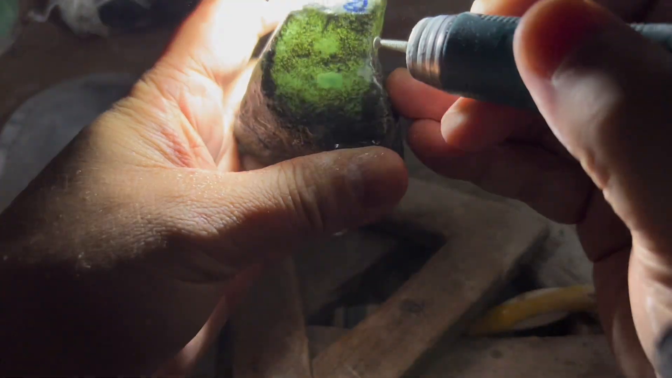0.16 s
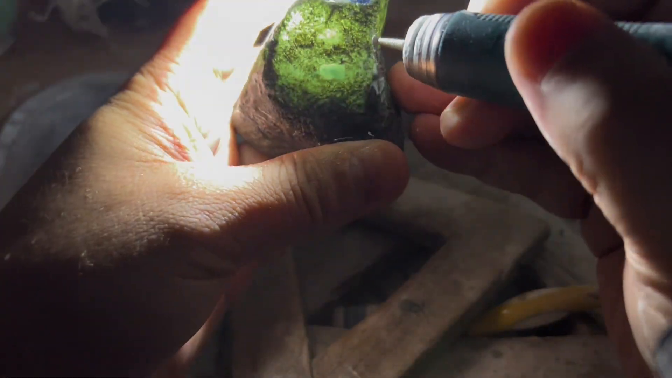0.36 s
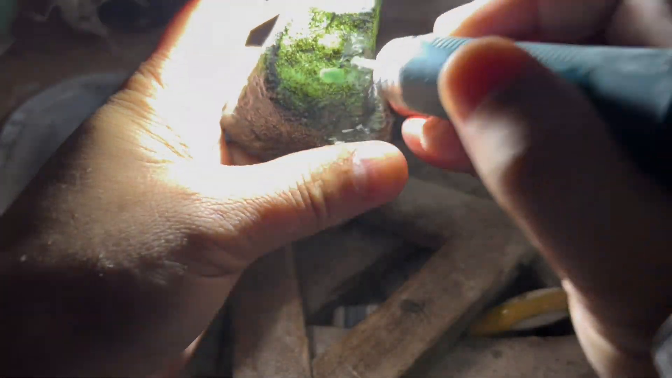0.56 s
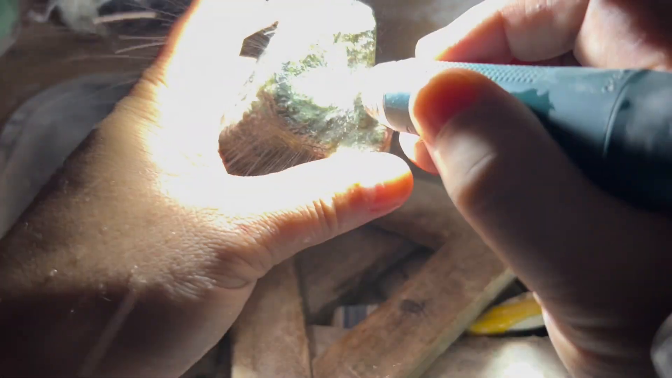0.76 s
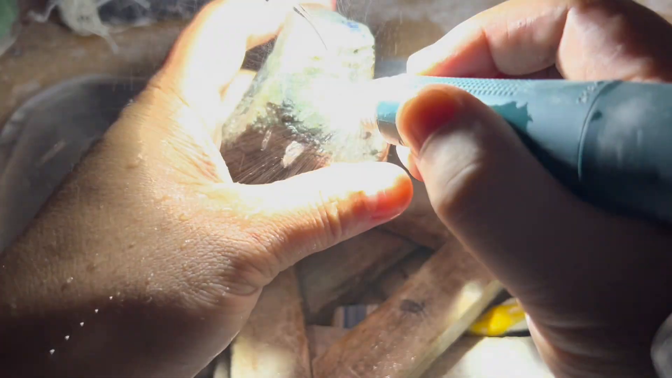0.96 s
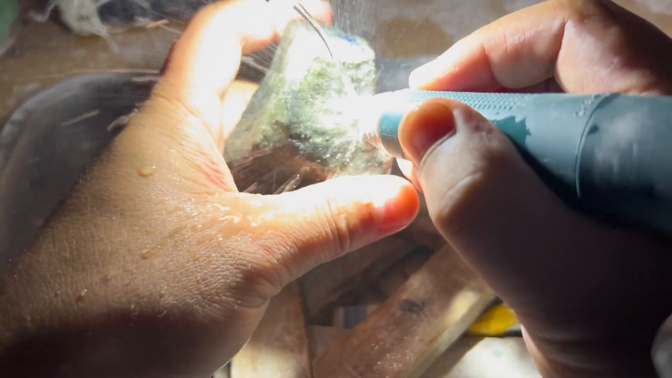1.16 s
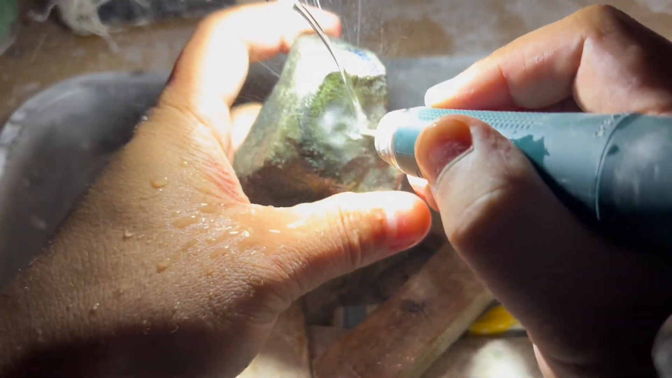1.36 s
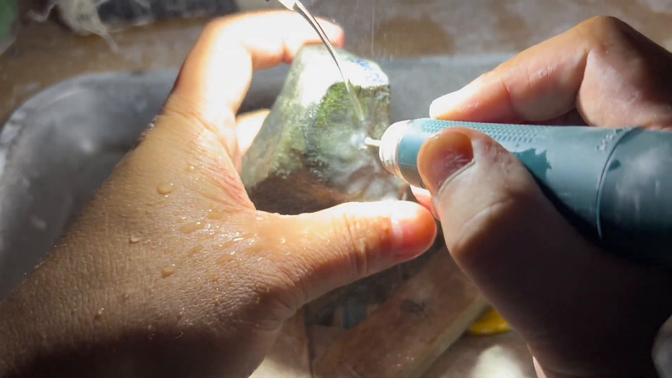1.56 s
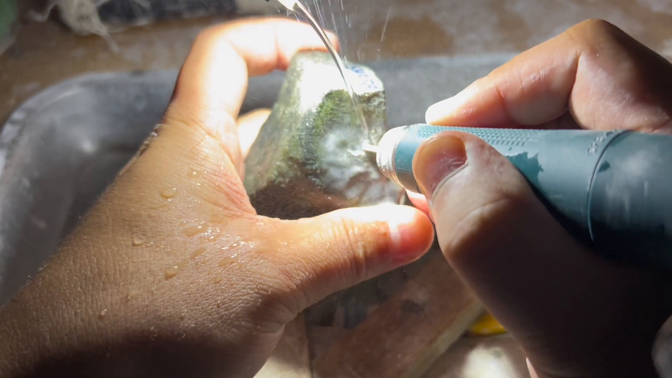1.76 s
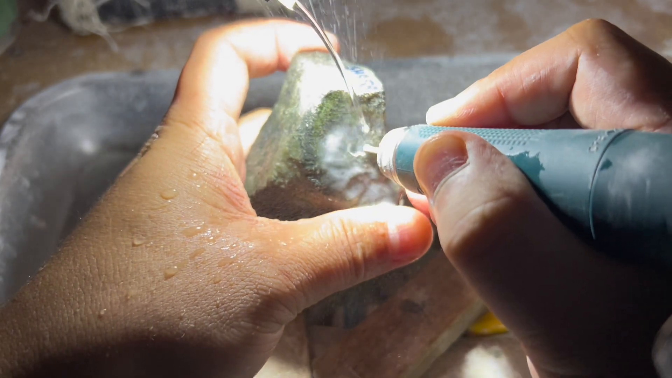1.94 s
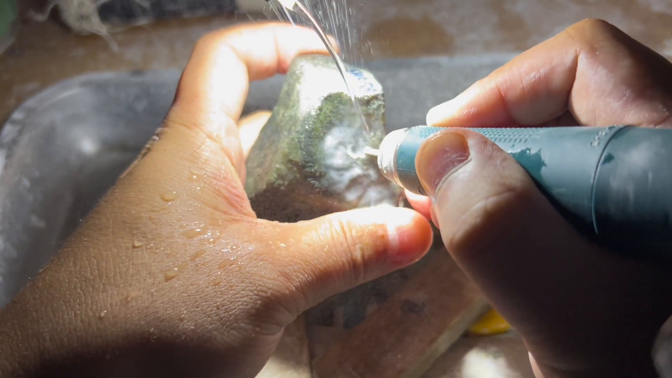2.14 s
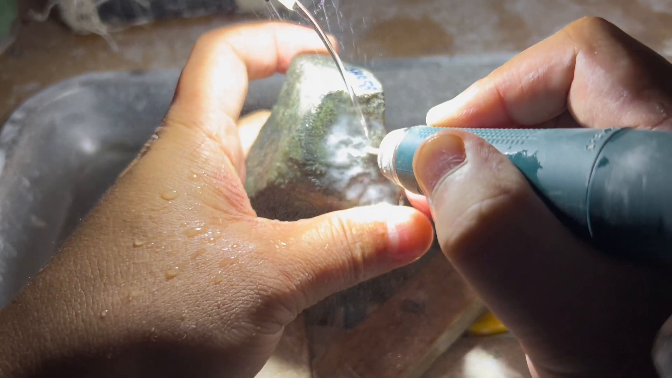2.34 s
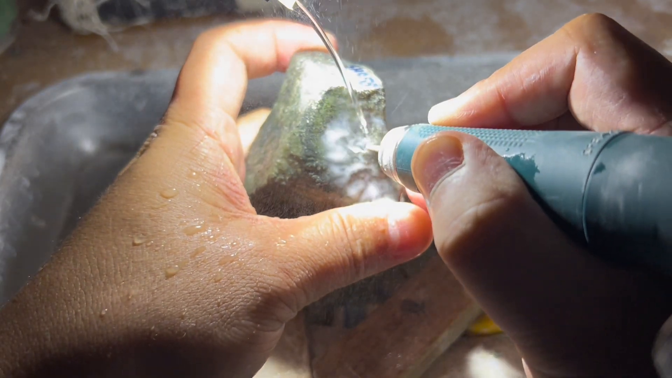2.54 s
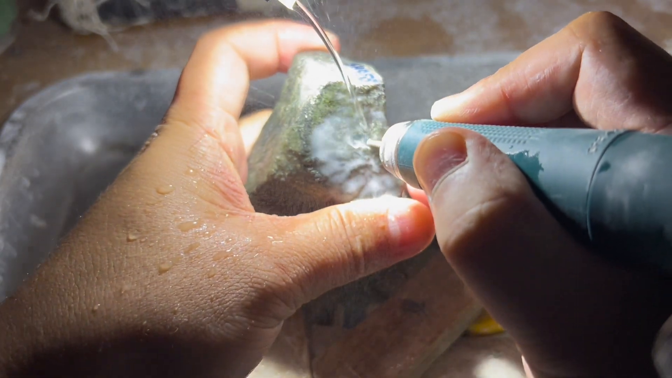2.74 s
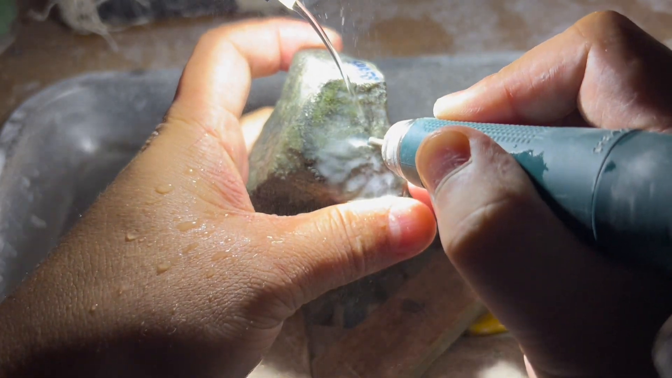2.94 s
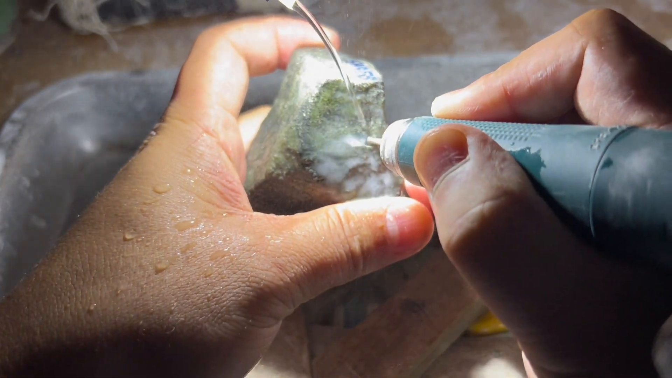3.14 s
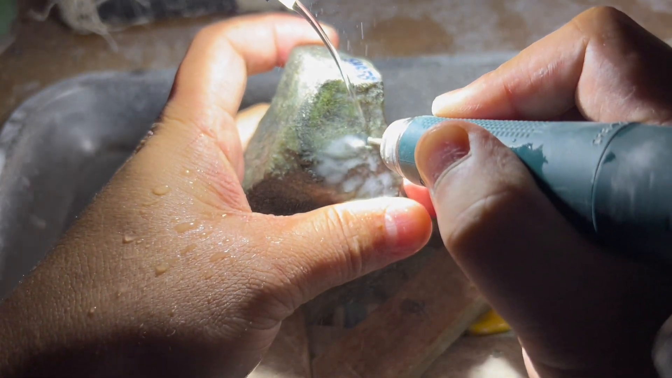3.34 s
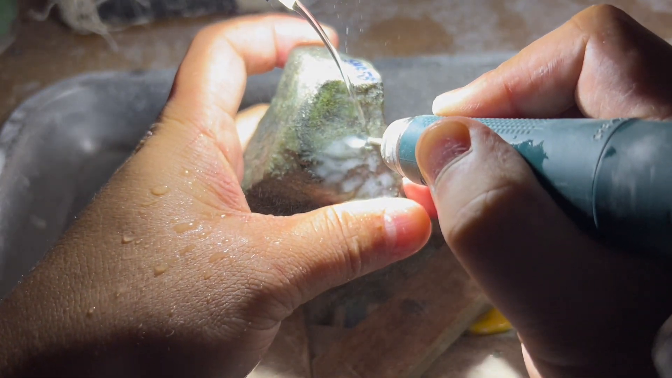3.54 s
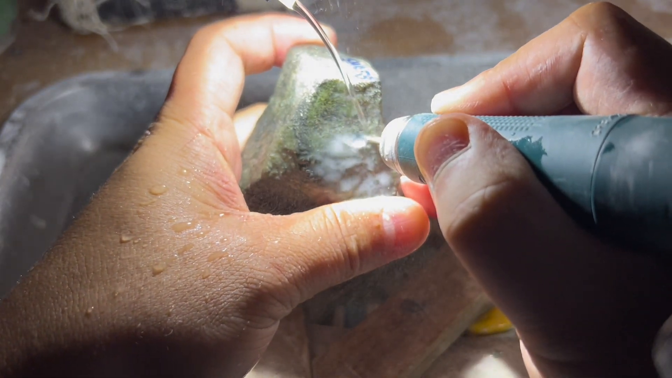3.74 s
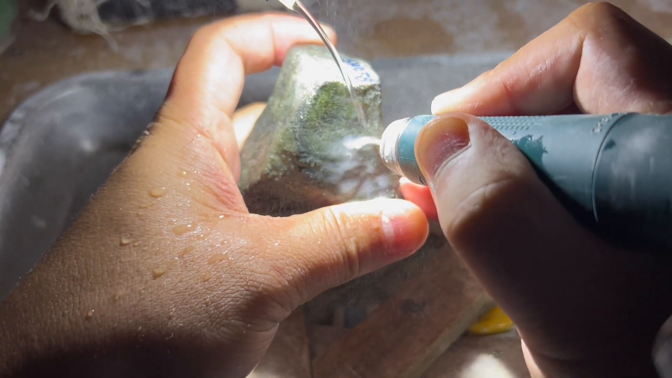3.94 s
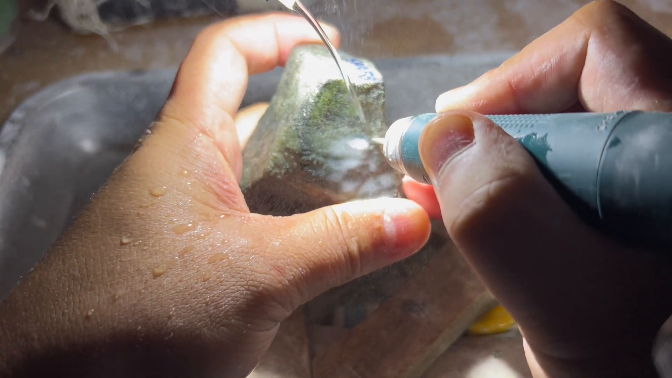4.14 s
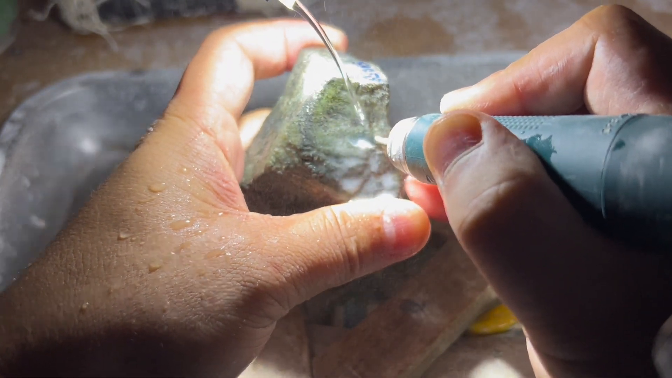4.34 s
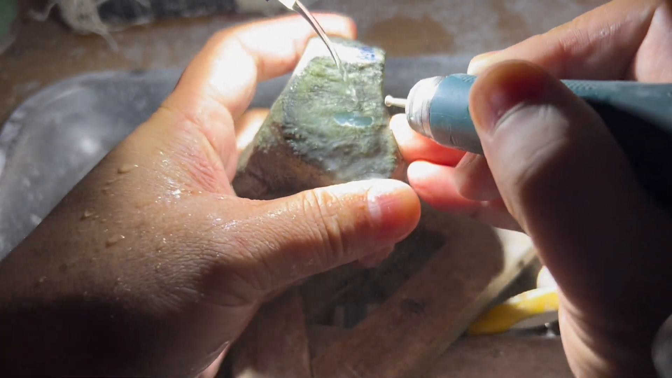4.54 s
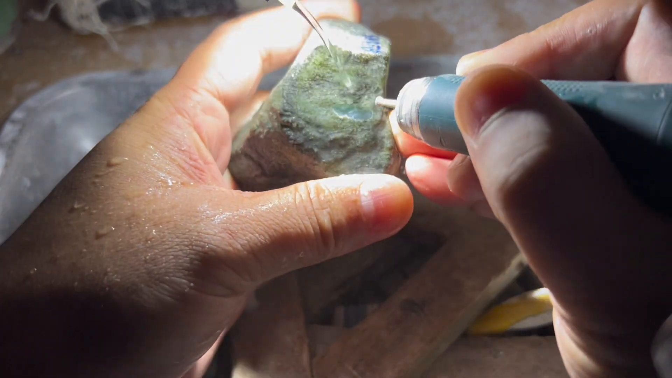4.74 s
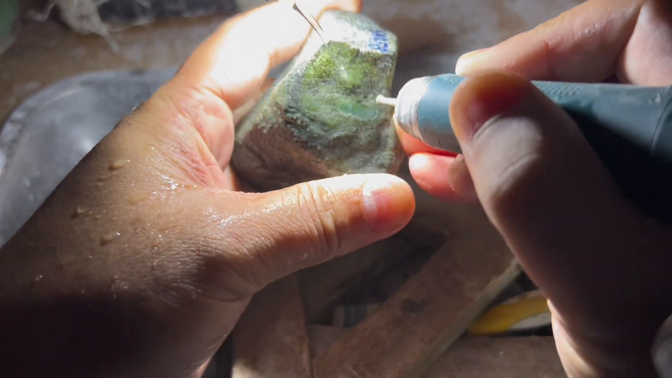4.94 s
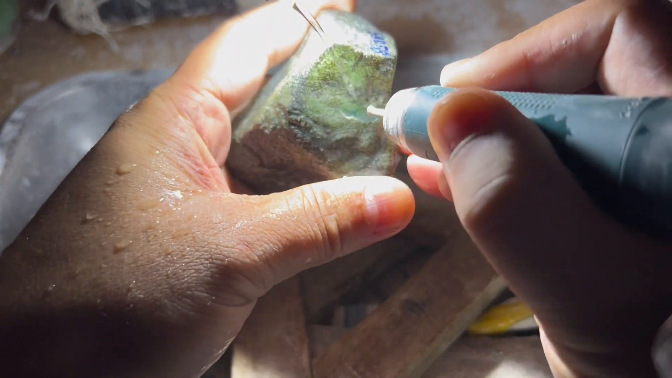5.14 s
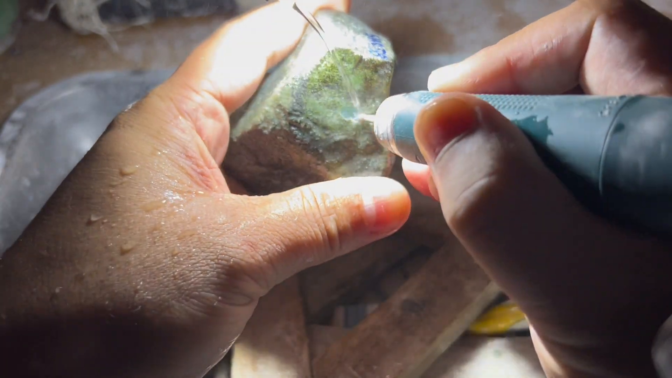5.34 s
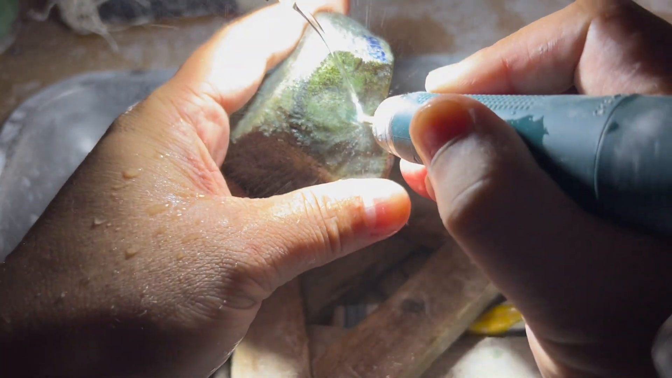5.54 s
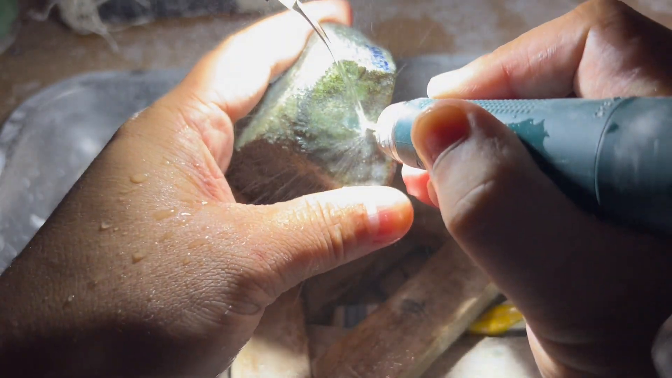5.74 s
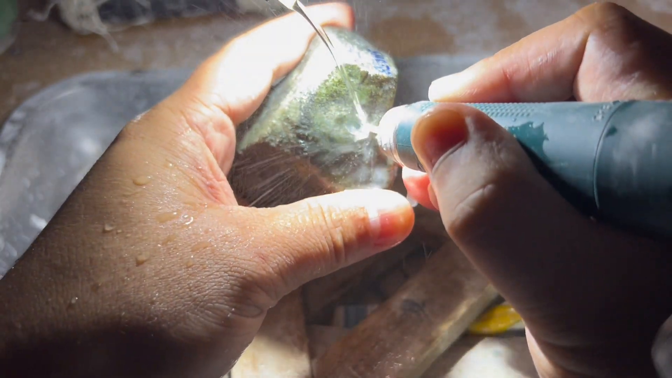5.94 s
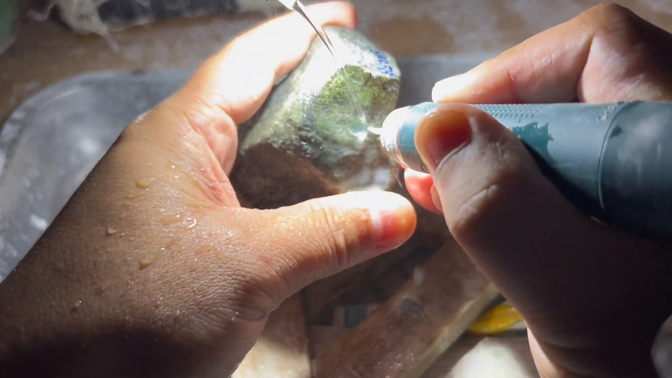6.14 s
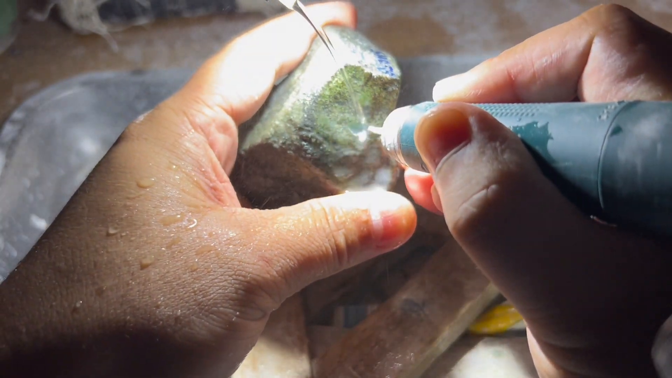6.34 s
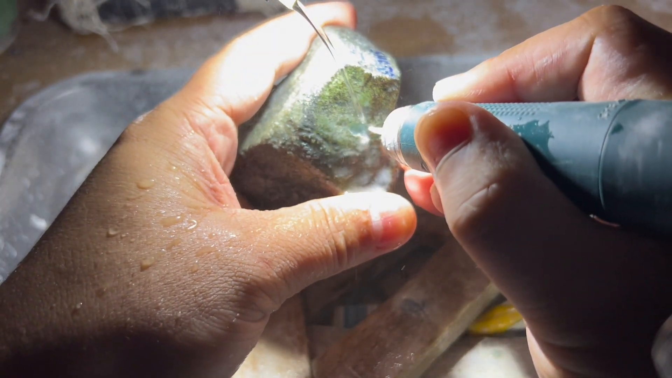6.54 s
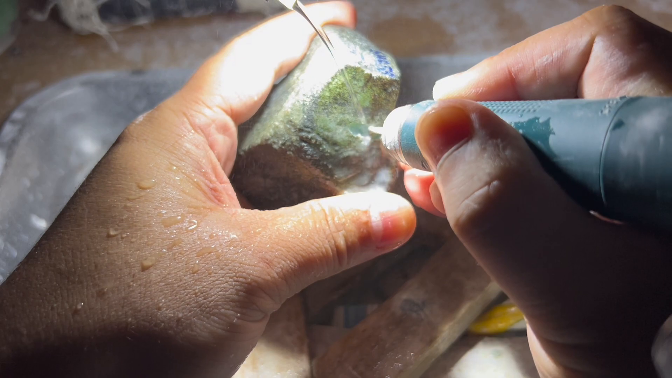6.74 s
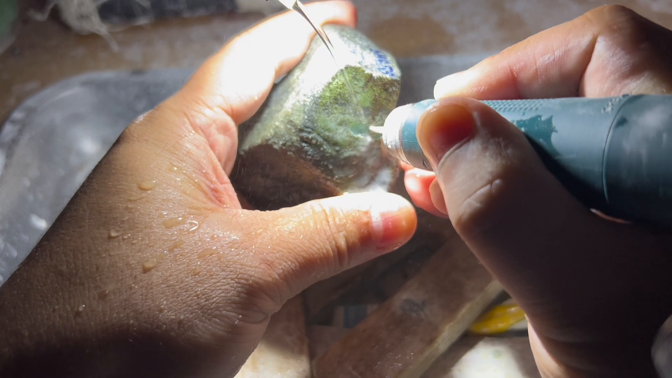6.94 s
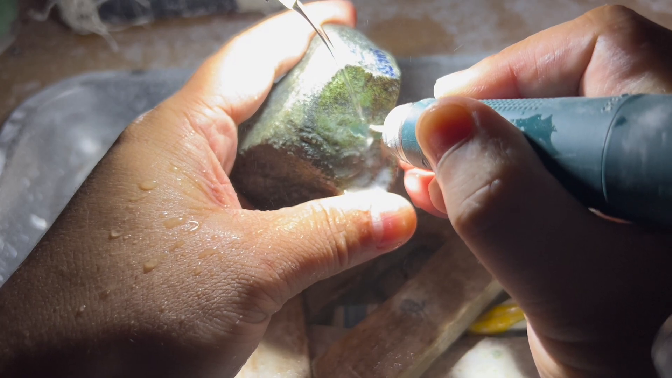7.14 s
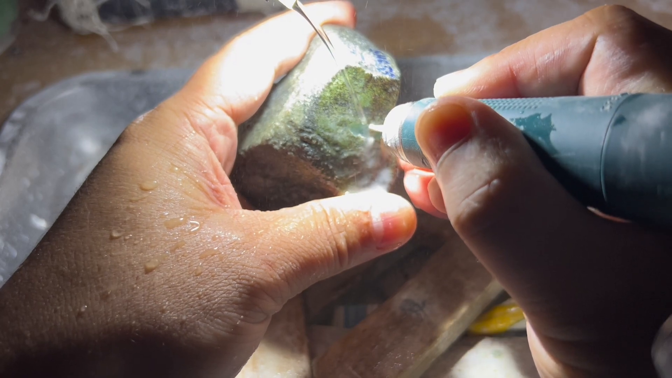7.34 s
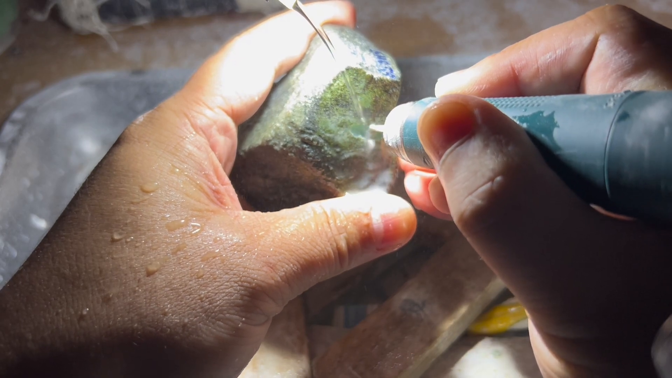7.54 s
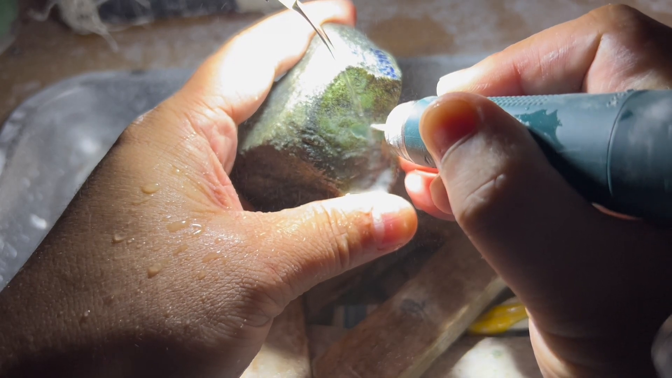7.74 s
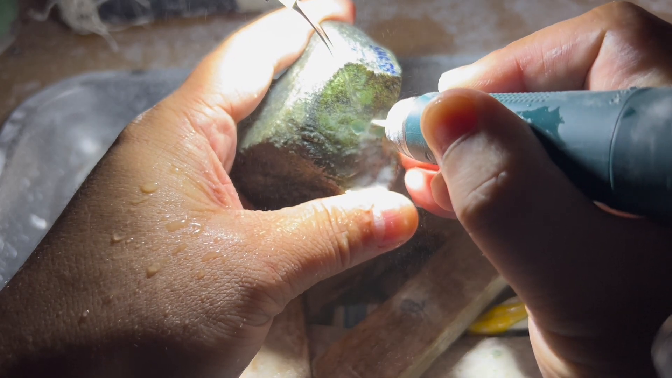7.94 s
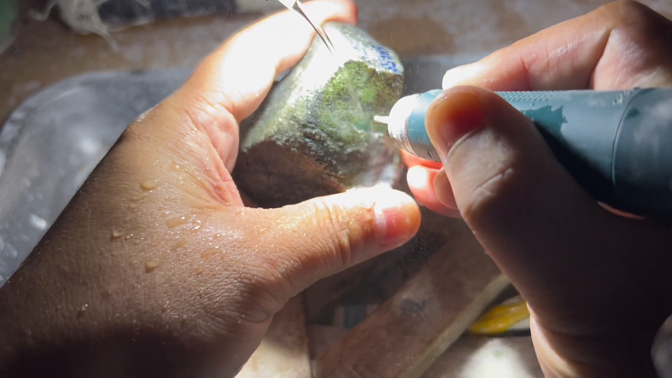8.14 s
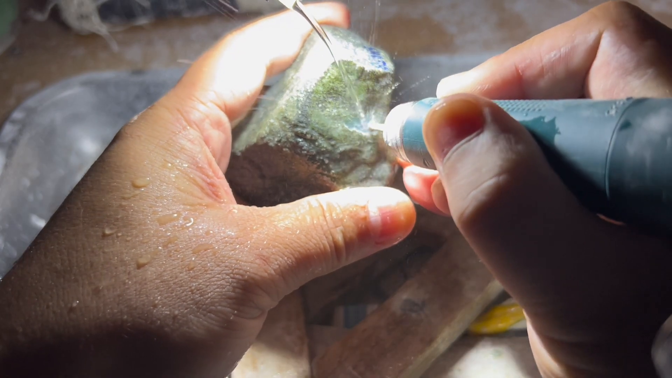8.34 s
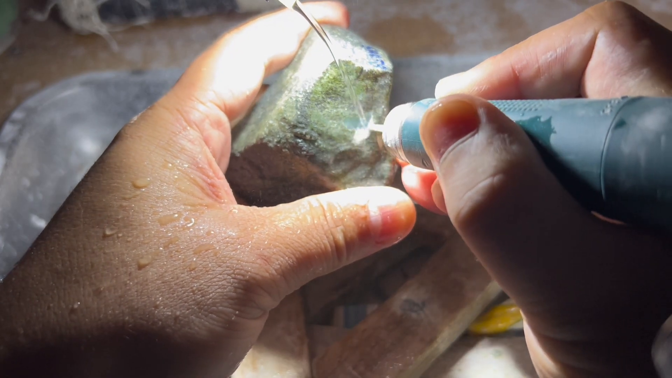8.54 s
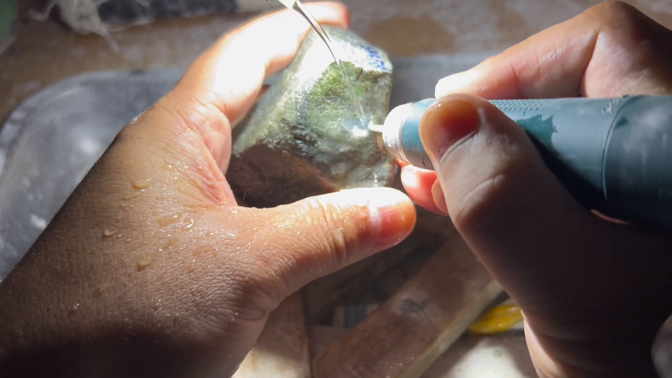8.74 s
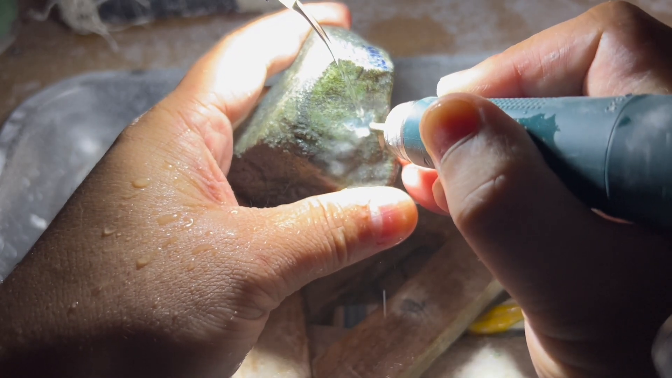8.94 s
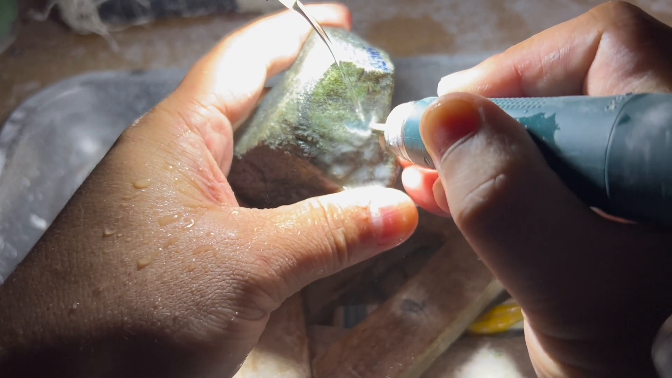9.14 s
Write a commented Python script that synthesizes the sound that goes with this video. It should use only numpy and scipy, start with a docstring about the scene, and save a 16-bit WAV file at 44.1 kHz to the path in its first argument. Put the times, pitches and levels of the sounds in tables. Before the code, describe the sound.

Close, shrill grinding of a small spinning burr on wet stone, rough and fluttering, broken by two short pauses of thin motor whine.

```python
"""Low workshop murmur and a thin motor whine come first; the burr of a handheld rotary tool spins up close.
At 0.9 s it knocks onto wet stone: its strikes, about 840 a second, stack up as tones with chatter and grit.
It lifts at 4.4 s and the shaft races, leaving whine and murmur; a second cut runs from 5.3 to 8.2 s.
A knock at 8.3 s comes just before the third cut, which lasts to the end while the whine sinks.
Tones are sines locked to the turn; grit, murmur and hiss are shaped noise; knocks and bumps are decaying rings."""
import sys
import numpy as np
from scipy import signal
from scipy.fft import rfft, irfft
from scipy.io import wavfile
from scipy.ndimage import uniform_filter1d

SR = 44100
rng = np.random.default_rng(int(sys.argv[2]) if len(sys.argv) > 2 else 0)


def attenuation_scalar(level_db):
    """Turn a level in dB into a linear amplitude multiplier (20 dB per decade)."""
    decades = np.asarray(level_db, float) / 20
    return 10 ** decades


def digitize_waveform(pressure):
    """Quantize a signal to 16-bit integers and store it at the path in sys.argv[1].

    Rows of a 2-D input are taken as channels; values are limited to [-1, 1].
    """
    field = np.atleast_2d(pressure).T
    bounded = np.clip(field, -1, 1)
    quanta = np.round(bounded * 32767).astype(np.int16)
    wavfile.write(sys.argv[1], SR, quanta)


N = 405279
T = np.arange(N) / SR  # s

# workshop bed: time_s, rumble_db, murmur_db (both before trims)
SHOP = [(0, -67, -74.5), (.3, -73.5, -75), (.5, -74, -80), (.87, -71.5, -83.5), (1.6, -66.5, -75.5),
        (2.3, -64.5, -76.5), (2.57, -62, -71.5), (3.0, -77, -79), (3.25, -64.5, -73), (3.75, -64, -72),
        (4.1, -63, -69.5), (4.58, -86, -81), (4.85, -72, -87.5), (5.05, -77, -75), (5.2, -72, -70.5),
        (5.35, -71, -72), (5.5, -76, -80.5), (6.5, -71, -76), (6.8, -72, -70), (8.1, -71, -75),
        (8.4, -82, -87), (9.19, -77, -78.5)]
# spectra of rumble, murmur and hiss: freq_hz, relative_db
RUMBLE_SPECTRUM = [(15, -45), (25, -23), (56, -1), (70, -1), (82, 2), (107, -2), (143, 0.5), (220, -9),
                   (290, -43), (480, -120)]
MURMUR_SPECTRUM = [(110, -35), (180, 0.5), (222, -5.5), (354, -4), (636, -15.5), (859, -19), (908, -30),
                   (1110, -6), (1600, -44), (2080, -69), (3520, -120)]
HISS_SPECTRUM = [(940, -11), (1600, -14), (3470, -15.5), (4580, -14.5), (5180, -9.5), (5330, -15.5),
                 (12100, -14.5), (13600, -33), (15700, -1)]
# low hum under the first cut: time_s, pitch_hz, level_db
LOW_HUM = [(.82, 68.5, -75), (.9, 67.6, -70), (1.33, 68, -67), (1.64, 71.3, -68), (1.85, 73.94, -73),
           (2.6, 76.2, -65), (3.16, 72.9, -71), (3.7, 76, -67.5), (4.3, 68.3, -84)]
# dull bumps through the bench: start_s, gain_db, pitch_hz
BUMPS = [(1.669, -58, 454), (2.56, -64, 248), (3.72, -66, 249.4), (4.01, -63, 250), (5.13, -62, 299),
         (5.31, -64, 300), (6.51, -63, 250.3)]
# shaft; it races when the load goes and is reined in again: time_s, speed_turns_per_s, hum_db
SHAFT = [(0, 840, -105), (.84, 841, -84), (.99, 850, -74), (1.08, 830, -67), (1.28, 840, -64.5),
         (1.4, 847, -66.5), (1.82, 830, -60), (2.1, 843, -64.5), (2.7, 835, -58.5), (3.4, 840, -60.5),
         (4.0, 830, -68), (4.34, 838, -62.5), (4.4, 860, -65), (4.46, 890, -78), (4.8, 832, -86),
         (4.95, 838, -87), (5.25, 840, -82), (5.5, 834, -69.5), (5.76, 837, -56.5), (5.9, 828, -60),
         (6.02, 845, -74), (6.16, 830, -69.5), (6.83, 839, -75), (7.7, 830, -72), (8.16, 830, -60.5),
         (8.22, 865, -64), (8.29, 880, -77), (8.42, 865, -77), (8.55, 825, -73), (8.72, 840, -64.5),
         (8.96, 826, -63), (9.19, 826, -77)]
# free-running motor and bearings: multiple_of_turn_rate, level_db (before the whine fader)
WHINE = [(2, -77), (3, -85.5), (4, -81.5), (5, -93), (6, -74.5), (7, -101), (8, -86.5), (8.75, -90),
         (9, -88), (10, -94), (12, -84.5), (14, -81), (15, -100), (18, -90), (18.6, -100)]
# drive electronics, unmoved by speed: pitch_hz, level_db (before the whine fader)
STEADY_LINES = [(3607, -89), (3957, -89), (6062, -89), (8021, -86), (11192, -85)]
# whine fader: time_s, gain_db
WHINE_FADER = [(0, 0), (.85, 2.5), (4.4, -0.5), (4.9, -1.5), (5.3, -0.5), (8.3, -0.5), (9.19, -13)]
# burr meets and leaves the stone: start_s, end_s
TOUCHES = [(0.865, 4.418), (5.269, 8.245), (8.416, 9.19)]
# knocks around the landings: start_s, gain_db, ring_hz
KNOCKS = [(0.8788, -33.5, 2030), (8.323, -47, 2570)]
# every second strike is harder, in bursts, heard at half the turn rate: start_s, end_s, gain_db
BUZZ = [(2.452, 2.804, -69), (2.998, 3.14, -68), (3.207, 3.3, -68), (3.381, 3.521, -68), (3.97, 4.082, -73),
        (4.289, 4.36, -65), (5.859, 5.968, -66.5), (6.133, 6.19, -66), (6.279, 6.33, -68),
        (6.65, 6.69, -72), (6.75, 7.9, -68.5), (8.84, 8.92, -70)]
# odd multiples 1, 3, 5 .. 11 of the half rate: gain_db
BUZZ_TONES_DB = [-1, -2.5, 6, 9.6, 10, 9]
# spells of shank bounce, slower than the turn: start_s, end_s, first_hz, last_hz, depth (0-1)
CHATTER = [(1.0, 1.3, 200, 139.6, 0.37), (1.3, 2.0, 85, 54.9, 0.61), (2.04, 2.48, 215, 215.3, 0.55),
           (3.48, 3.75, 280, 259.9, 0.5), (3.75, 4.02, 190, 30.6, 0.68), (4.02, 4.32, 30.5, 199.6, 0.67),
           (5.62, 6.05, 85, 87.6, .5), (6.05, 6.73, 55, 60.05, 0.73), (6.78, 8.0, 210, 208, 0.29),
           (8.68, 9.25, 48, 80.1, .78)]
# bounce tones just below multiples of the turn rate: multiple, gain_db (against the grit column of CONTACT)
BOUNCE_TONES = [(2, 2), (3, 5), (4, -9.5), (5, 2.5), (8, 0.5)]
# one table a touch; light touch squeals cleanly, full pressure cuts roughly; levels before trims:
# time_s, second_tone_db, third_tone_db, upper_tones_db, grit_db, high_ring_db, roughness (1 = full pressure)
CONTACT = [
    [(.864, -66, -64, -42, -80, -50, 0.4), (.92, -74, -58, -52.5, -82, -53, 0.42),
     (1.0, -76, -52, -50, -67, -47, 0.44), (1.015, -74, -46, -44, -60, -43.5, 0.73),
     (1.17, -67, -51, -51, -60.5, -40.5, 0.75), (1.3, -60, -56.5, -47.5, -58, -41, 0.74),
     (1.5, -65, -52.5, -46.5, -60, -39.5, 0.82), (1.8, -46.5, -42.5, -48, -54.5, -39.5, 0.77),
     (1.98, -52.5, -45, -49, -54.5, -39.5, 0.85), (2.07, -50, -46.5, -53, -53.5, -40.5, 1.14),
     (2.48, -65, -50.5, -58, -55.5, -45, 1.07), (2.71, -59.5, -44, -53, -54.5, -43, 1.06),
     (3.2, -61.5, -51.5, -54, -56.5, -42, 1.03), (3.5, -65, -52, -56, -57.5, -39.5, 0.98),
     (3.9, -66, -49, -56, -55.5, -40, 0.96), (4.2, -56.5, -51, -55.5, -55, -41, 0.85),
     (4.36, -62, -63, -54.5, -63, -41.5, 1.08), (4.42, -61, -62, -55, -62, -48, 0.68)],
    [(5.266, -81, -74, -52, -84, -66, .2), (5.33, -85, -71, -57, -75, -63, 0.3),
     (5.41, -71, -48, -47, -83, -53, .18), (5.52, -71, -45.5, -48, -65.5, -44.5, 0.37),
     (5.7, -49, -43, -50.5, -56.5, -42.5, 0.89), (5.9, -54, -46, -48.5, -52, -38, 0.87),
     (6.17, -51.5, -45, -51, -53, -39.5, 0.91), (6.8, -56, -52.5, -54.5, -54.5, -42, 1.01),
     (7.4, -59, -54.5, -54, -54, -41.5, 0.98), (7.7, -54.5, -49, -55, -53.5, -43.5, 1),
     (8.12, -51, -54.5, -57, -56, -38, 1.01), (8.2, -55.5, -45, -49, -56.5, -41, 0.58),
     (8.25, -48.5, -58, -46, -69, -47, 0.3)],
    [(8.417, -84, -64, -52.5, -89, -77, 0.17), (8.46, -70, -48, -46.5, -84, -46, 0.2),
     (8.51, -60, -48, -44.5, -69, -46, 0.25), (8.6, -72, -50.5, -51, -61, -45, .4),
     (8.76, -60, -61, -51, -60, -40.5, 0.86), (8.86, -46, -49, -51.5, -56.5, -39.5, .85),
     (9.04, -54, -54, -53.5, -57, -39, .87), (9.19, -47, -64, -50, -50.5, -41.5, 1)],
]
# upper tones; after a landing some break in late: multiple, light_db, full_pressure_db, delay_s
UPPER_TONES = [(5, -7.5, -0.5, 0.053), (6, -20, -7, 0.032), (7, -4, -5, 0.0018), (8, 4, 3.5, 0.039),
               (9, 0, 1, 0.0012), (10, -10, -2, 0.0082)]
# burr's high ring, multiples 11 to 18 of the turn rate: gain_db (against high_ring_db)
HIGH_RING_DB = [-23.5, -19.5, -12.5, -10.5, -12, -40, -13.5, -8]
# grit spectrum: freq_hz, relative_db
GRIT_SPECTRUM = [(290, -32), (500, -30.5), (1300, -18), (1660, -11.5), (1800, -14), (2480, -7),
                 (3120, -14.5), (3260, -9.5), (5320, -12), (6900, -4.5), (9610, -11.5), (12100, -3),
                 (13400, -16), (14600, -0.5), (15700, 0.5)]
# borders between the low, middle and high grit: freq_hz
GRIT_EDGES_HZ = (4600, 9650)
# burr bites in and the grit flares: start_s, gain_db
BITES = [(1.007, 7), (1.085, 8), (2.32, 3.5), (2.4, 3.5), (5.69, 7), (5.74, 6.5), (5.79, 3), (5.86, 4.5),
         (5.94, 5), (6.55, 1.5), (6.82, 4), (8.15, 7), (8.625, 8.5), (8.84, 10.5), (8.96, 6.5)]
# silent stretches of treble: low_hz, high_hz
DEAD_BANDS_HZ = [(9480, 9780), (13130, 13760), (15760, 22050)]


def curve(rows):
    """Draw each column of a time_s, .. table as one value per sample."""
    time_s, *columns = np.transpose(rows)
    return [np.interp(T, time_s, column) for column in columns]


def unit(x):
    """Scale to rms 1."""
    return x / np.sqrt(np.mean(x ** 2))


def band(x, lo_hz, hi_hz):
    """Keep only what lies between two frequencies."""
    hz = np.fft.rfftfreq(N, 1 / SR)
    return irfft(rfft(x) * ((hz >= lo_hz) & (hz < hi_hz)), N)


def colour(x, spectrum):
    """Shape a sound by freq_hz, relative_db points and scale it to rms 1."""
    hz, db = np.transpose(spectrum)
    log_hz = np.log(np.fft.rfftfreq(N, 1 / SR) + 1)
    gain = attenuation_scalar(np.interp(log_hz, np.log(hz), db, -90, -90))
    return unit(irfft(rfft(x) * gain, N))


def walk(rate):
    """Slide between random values, rate of them a second; rms 1."""
    hold = max(int(SR / rate), 1)
    values = np.repeat(rng.standard_normal(N // hold + 1), hold)
    return unit(uniform_filter1d(values, hold)[:N])


def steps(rate):
    """Jump between random values about rate times a second; spread about 1."""
    jumps = np.cumsum(rng.random(N) < rate / SR)
    return uniform_filter1d(rng.standard_normal(N)[jumps], size=300)


def spell(start, end):
    """1 between two times, with 48 ms fades centred on them."""
    return np.clip(np.minimum(T - start, end - T) / 0.048 + 0.5, 0, 1)


def tone(phase, db, rough):
    """A sine that flutters at random and grows a noisy skirt with roughness."""
    flutter = attenuation_scalar(db + 1.88 * rough * walk(rate=32.0))
    skirt = 1 + 0.4 * rough * walk(rate=260.0)
    return np.sqrt(2) * flutter * skirt * np.cos(phase + rng.uniform(0, 2 * np.pi))


def workshop():
    """Noise shaped into rumble, patchy murmur and faint hiss, plus a wavering low hum with its octave."""
    rumble_db, murmur_db = curve(SHOP)
    rumble, murmur, hiss = (colour(rng.standard_normal(N), spectrum)
                            for spectrum in (RUMBLE_SPECTRUM, MURMUR_SPECTRUM, HISS_SPECTRUM))
    hum_hz, hum_db = curve(LOW_HUM)
    phase = 2 * np.pi * np.cumsum(hum_hz) / SR
    hum_on = (T > LOW_HUM[0][0]) * (T < LOW_HUM[-1][0])
    hum = (tone(phase, hum_db, 0.31) + tone(2 * phase, hum_db - 9.5, 0.4)) * hum_on
    rumble = rumble * attenuation_scalar(rumble_db - 2.6 * hum_on)  # makes room for the hum
    murmur = murmur * attenuation_scalar(murmur_db + 1.0 + 2.0 * walk(rate=14.0))
    return rumble + hum + murmur + hiss * attenuation_scalar(-76.5)


def bumps():
    """A short dull ring of the bench: two decaying sines a bump."""
    out, t = np.zeros(N), T[:4000]
    for start_s, gain_db, hz in BUMPS:
        ring = np.sin(2 * np.pi * hz * t) * np.exp(-t / 0.021)
        thud = 1.496 * np.sin(2 * np.pi * 85.6 * t) * np.exp(-t / 0.02)
        first = int(start_s * SR)
        out[first:first + len(t)] += attenuation_scalar(gain_db) * (ring + thud)
    return out


def motor(turn, hum_db):
    """Hum of the unbalanced shaft, with thin lines that follow the turn or stay at fixed pitch."""
    lines = sum(attenuation_scalar(db) * np.cos(k * turn + k) for k, db in WHINE)
    lines = lines + sum(attenuation_scalar(db) * np.cos(2 * np.pi * hz * T) for hz, db in STEADY_LINES)
    fader = attenuation_scalar(curve(WHINE_FADER)[0] + 0.75 * walk(rate=12.0))
    return tone(turn, hum_db, 0.62) + np.sqrt(2) * lines * fader


def knocks():
    """A sharp blow: a short noise crack and a two-tone ring of the stone."""
    out, t = np.zeros(N), T[:2000]
    for start_s, gain_db, hz in KNOCKS:
        ring = 0.5 * np.sin(2 * np.pi * hz * t) + 0.45 * np.sin(2 * np.pi * 1.87 * hz * t)
        crack = 1.2 * rng.standard_normal(len(t)) * np.exp(-t / 0.0017)
        first = int(start_s * SR)
        out[first:first + len(t)] += attenuation_scalar(gain_db) * (crack + ring * np.exp(-t / 0.0043))
    return band(out, 760.0, 9000.0)


def buzz(turn):
    """Harder alternate strikes, as rough odd multiples of half the turn rate."""
    bursts = sum(attenuation_scalar(db) * spell(start, end) for start, end, db in BUZZ)
    bursts = bursts * attenuation_scalar(2.15 * walk(rate=36.0))
    half = turn / 2 + 0.27 * walk(rate=60.0)
    return bursts * sum(tone((2 * k + 1) * half, db, 1.32) for k, db in enumerate(BUZZ_TONES_DB))


def chatter(turn, grit_db):
    """The uneven bounce of the shank beats against the turn: rough tones beside its multiples, and the beat."""
    glide = []
    for start, end, first_hz, last_hz, _ in CHATTER:
        glide += [(start + 0.0045, first_hz), (end - 0.005, last_hz)]
    bounce_hz = curve(glide)[0]
    depth = sum(d * spell(start, end) for start, end, _, _, d in CHATTER)
    uneven_hz = bounce_hz * (1 + 0.0998 * walk(rate=90.0)) + 14.05 * walk(rate=60.0)
    bounce = 2 * np.pi * np.cumsum(uneven_hz) / SR
    below = sum(tone(k * turn - bounce, grit_db + db, 1.11) for k, db in BOUNCE_TONES)
    fast = np.clip(bounce_hz / 80.0 - 1, 0, 1)  # only a fast bounce shows beside the turn rate itself
    beside = tone(turn + bounce, grit_db - 5, 1.1) + tone(turn - bounce, grit_db - 23.5, 1.14)
    return depth * (below + fast * beside), depth * np.cos(bounce)


def strikes(turn, second_db, third_db, upper_db, high_db, rough):
    """One blow a turn as a stack of multiples; the blows come a little early or late."""
    turn = turn + 0.097 * rough * walk(rate=70.0)

    def late(delay_s):
        """Hold a tone back by up to 21 dB just after each landing."""
        return -21 * sum((T > start) * np.exp(-((T - start) / delay_s) ** 2) for start, _ in TOUCHES)

    fourth_db = (third_db + upper_db) / 2 - 5 + late(0.12)
    levels = [(2, second_db), (3, third_db), (4, fourth_db)]
    for k, light_db, full_db, delay_s in UPPER_TONES:
        pressed_db = light_db + (full_db - light_db) * rough
        levels.append((k, upper_db + pressed_db + late(delay_s)))
    # each tone jumps in level at random, on its own
    out = sum(tone(k * turn, db + 2.5 * steps(24.0), 0.84 * rough) for k, db in levels)
    ring = sum(tone(k * turn, high_db + db, 1.42 * rough) for k, db in enumerate(HIGH_RING_DB, 11))
    return out + ring


def grit(turn, upper_db, grit_db, high_db, rough):
    """Noise scraping in step with the turn, in three separately wavering bands; bites flare the lower two."""
    # each bite starts at once and its dB dies away with a 23 ms time constant
    bite = attenuation_scalar(sum(db * (T > s) * np.exp(-np.abs(T - s) / 0.023) for s, db in BITES))
    in_step = 1 + 0.68 * np.cos(turn)
    scrape = rng.standard_normal(N) * in_step * attenuation_scalar(1.77 * walk(rate=900.0))
    scrape = colour(scrape, GRIT_SPECTRUM)
    low_gain = attenuation_scalar(grit_db + 4.0) * bite
    middle_gain = attenuation_scalar((upper_db + high_db) / 2 + 1.15) * rough ** 2 * bite
    high_gain = attenuation_scalar(high_db - 4.0) * rough
    edges = (0, *GRIT_EDGES_HZ, SR)
    return sum(unit(band(scrape, lo, hi)) * gain * attenuation_scalar(1.7 * walk(rate=30.0))
               for lo, hi, gain in zip(edges, edges[1:], (low_gain, middle_gain, high_gain)))


def cutting(turn):
    """Strikes, chatter and grit ring the stone and burr; the pressure of the hand wavers quickly."""
    second_db, third_db, upper_db, grit_db, high_db, rough = curve(sum(CONTACT, []))
    # sound starts at once and dies within milliseconds of lifting
    touch = sum((T > start) * np.exp(-np.maximum(T - end, 0) / 0.003) for start, end in TOUCHES)
    scrape = grit(turn, upper_db, grit_db, high_db, rough)
    rattle, beat = chatter(turn, grit_db)
    blows = strikes(turn, second_db, third_db, upper_db, high_db, rough)
    pressure = attenuation_scalar(1.07 * rough * walk(rate=32.0))
    return (blows + rattle + scrape * (1 + 0.44 * beat)) * touch * pressure


def scene():
    """Tool and workshop at a single microphone; the bench and walls add a short tail to the tool."""
    speed, hum_db = curve(SHAFT)
    loaded = sum(spell(start, end) for start, end in TOUCHES)
    speed = speed + 2.0 * loaded * walk(rate=22.0)  # wavers by 2 turns per s rms under load
    turn = 2 * np.pi * np.cumsum(speed) / SR
    tool = bumps() + motor(turn, hum_db) + knocks() + buzz(turn) + cutting(turn)
    # noise falling 60 dB in 0.42 s, cut off after 0.2 s
    tail = rng.standard_normal(9000) * np.exp(-np.log(1000) * T[:9000] / 0.42)
    tail = tail / np.sqrt(np.sum(tail ** 2))
    tool = tool + attenuation_scalar(-15) * signal.fftconvolve(tool, tail)[:N]
    return np.tile(workshop() + tool, (2, 1))


def low_pass(x):
    """Removes everything above the highest recorded frequency."""
    return signal.sosfilt(signal.butter(12, 16740, fs=SR, output="sos"), x)


def record(dry):
    """Silence two narrow stretches of the treble and the very top."""
    dead = np.array([sum(band(channel, lo, hi) for lo, hi in DEAD_BANDS_HZ) for channel in dry])
    return low_pass(dry - dead)


dry = scene()
out = record(dry)
digitize_waveform(out)
```